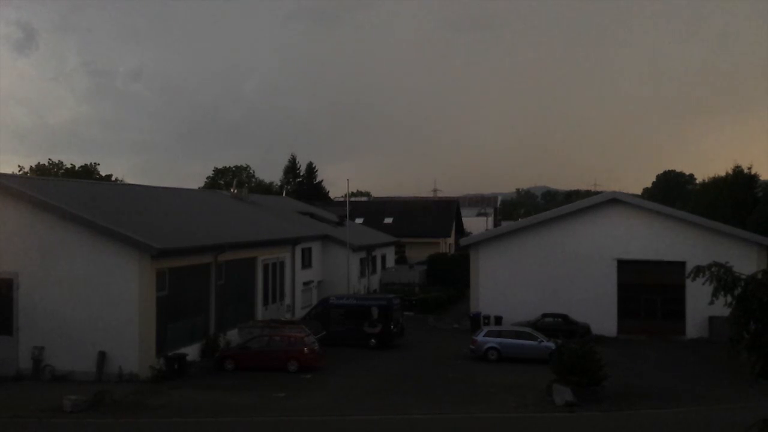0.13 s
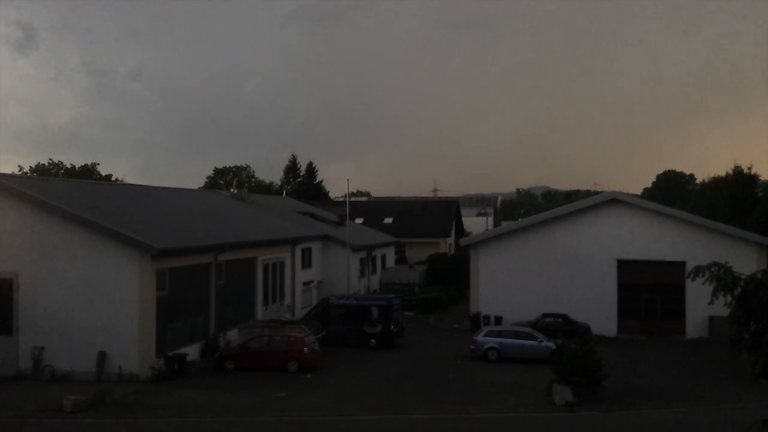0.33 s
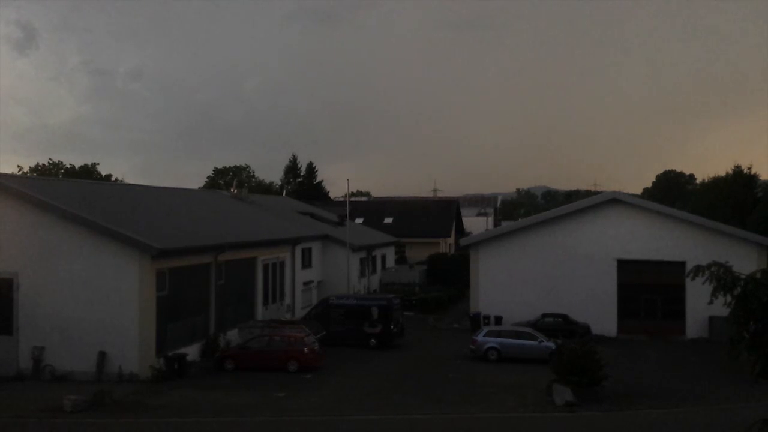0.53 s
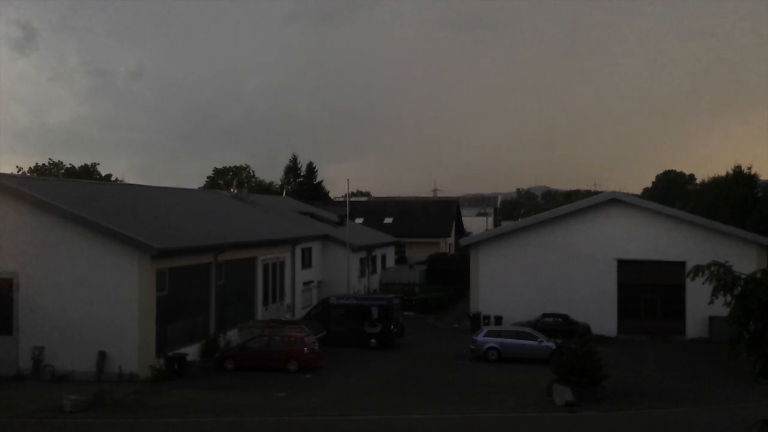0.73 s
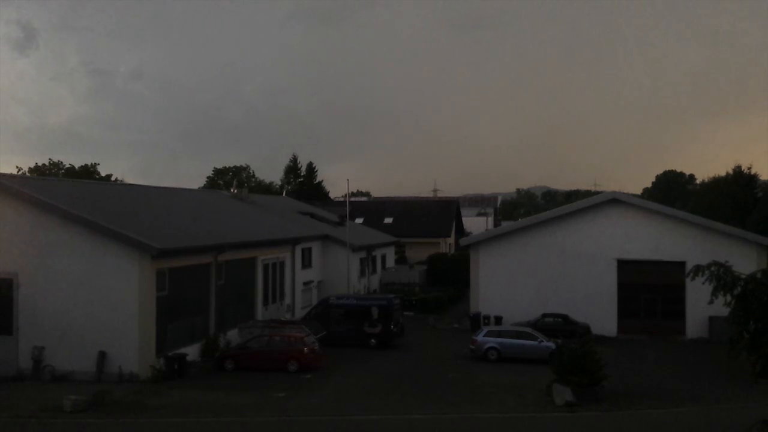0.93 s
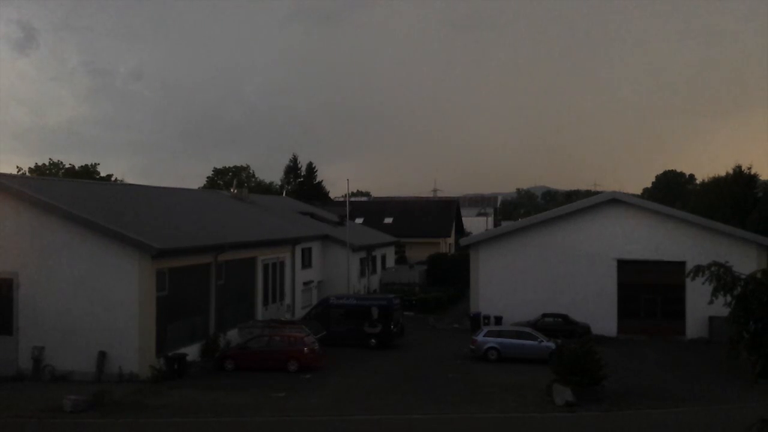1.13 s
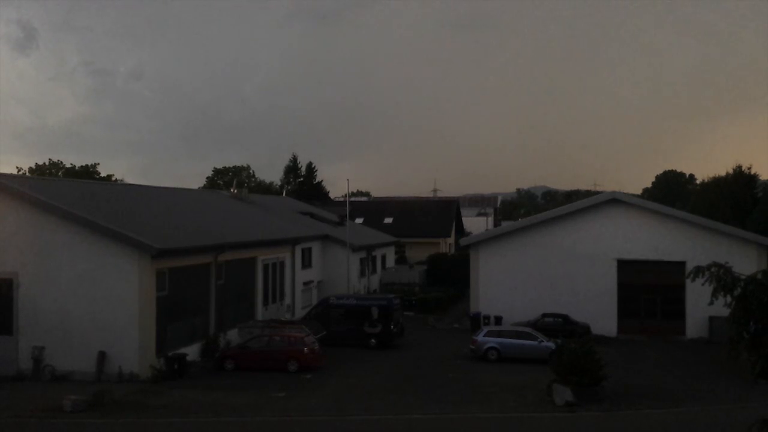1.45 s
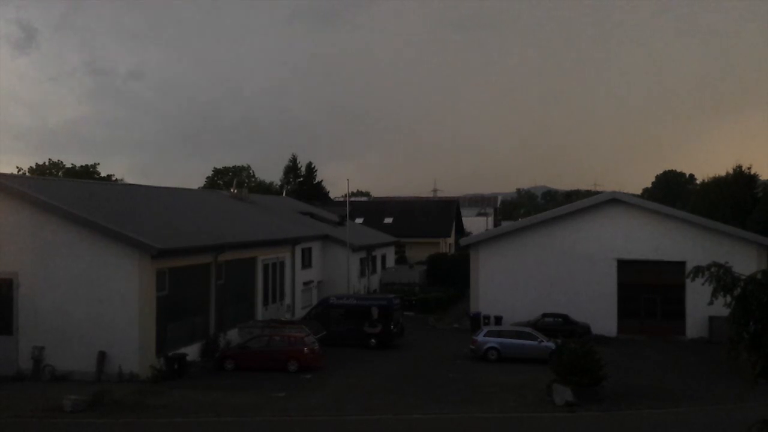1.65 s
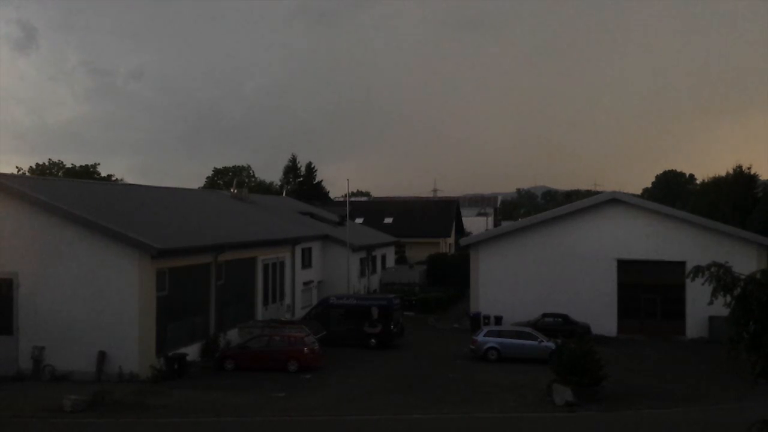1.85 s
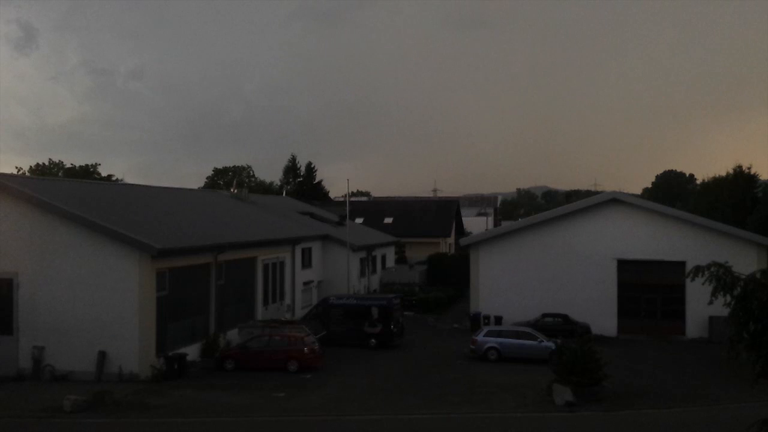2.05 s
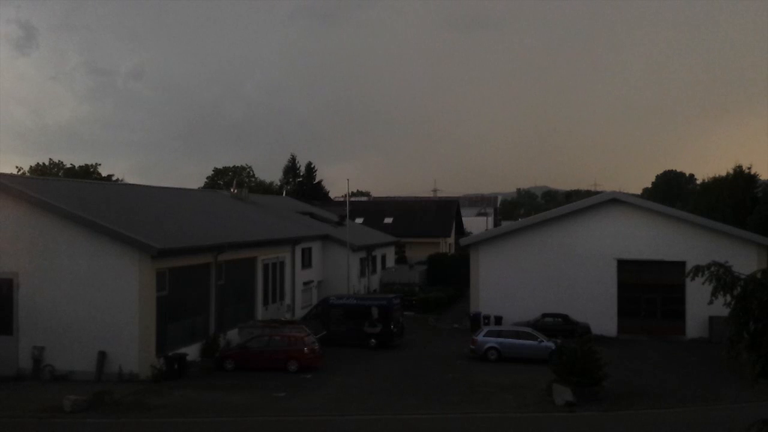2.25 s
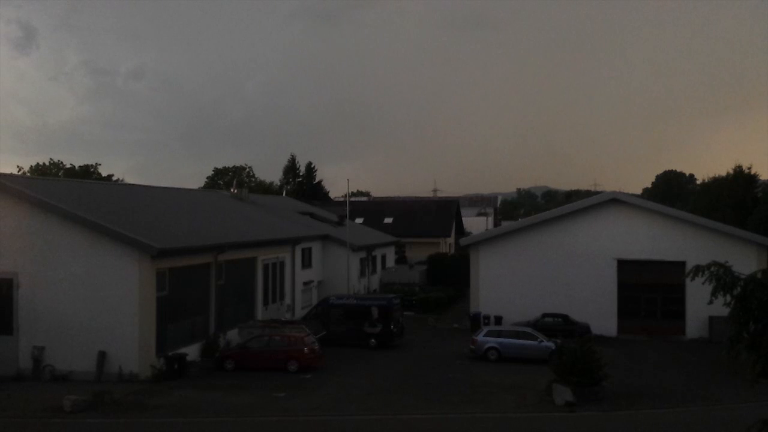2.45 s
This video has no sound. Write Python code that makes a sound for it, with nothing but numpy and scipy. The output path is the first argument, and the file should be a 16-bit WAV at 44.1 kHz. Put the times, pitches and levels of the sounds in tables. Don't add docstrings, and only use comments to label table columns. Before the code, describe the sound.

Muffled low thunder swells quickly and rumbles in overlapping claps before dying away. Faint leaf rustle, steady hiss and two tiny ticks close by; a stereo microphone in a room facing a residential yard.

```python
import sys
import numpy as np
from scipy import signal
from scipy.fft import rfft, irfft
from scipy.io import wavfile
from scipy.ndimage import uniform_filter1d

SR = 44100
rng = np.random.default_rng(int(sys.argv[2]) if len(sys.argv) > 2 else 0)


def transcribe(u):
    v = np.clip(np.atleast_2d(u).T, -1, 1)
    q = np.round(v * 32767).astype(np.int16)
    wavfile.write(sys.argv[1], SR, q)


def attenuation_scalar(level_db):
    decades = np.asarray(level_db, float) / 20
    return 10 ** decades


N = 114660


def evened(x):
    return x / np.sqrt(np.mean(x ** 2) + 1e-20)


def read(points, hz):
    f, value = np.transpose(points)
    return np.interp(np.log(hz + 1), np.log(f + 1), value)


def curve(rows, t, axis=1):
    return np.interp(t, np.array(rows)[:, 0], np.array(rows)[:, axis])


def coloured(x, points, beyond_db=-18):
    hz = np.fft.rfftfreq(N, 1 / SR)
    octaves_beyond = np.log2(np.maximum(hz / points[-1][0], 1))
    return irfft(rfft(x) * attenuation_scalar(read(points, hz) + beyond_db * octaves_beyond), N)


def resonate(x, hz, width):
    r = np.exp(-np.pi * width / SR)
    return 2 * signal.lfilter([1 - r], [1, -r * np.exp(2j * np.pi * hz / SR)], x).real


def pair(left, right, level, patchy_db, beyond_db):
    flicker_db = 0.35
    hz, t, z = signal.stft(rng.standard_normal((2, N)), SR, nperseg=512)
    patches = uniform_filter1d(rng.standard_normal(z.shape), size=8, axis=1)
    patches = evened(uniform_filter1d(patches, size=10, axis=2))
    flicker = evened(uniform_filter1d(rng.standard_normal(len(t)), size=5))
    z = z * attenuation_scalar(patchy_db * patches + flicker_db * flicker)
    x = signal.istft(z, SR, nperseg=512)[1][:, :N]
    x = evened(np.array([coloured(x[0], left, beyond_db), coloured(x[1], right, beyond_db)]))
    return x * attenuation_scalar(curve(level, np.arange(N) / SR) + 6.0)


def hiss():
    # start_s, level_db
    hiss_level = [(0, -70.5), (.17, -70), (.3, -66.5), (.7, -64.5), (1.2, -63), (2.18, -64.5), (2.4, -67.5),
                  (2.6, -66)]
    # pitch_hz, density_db (per Hz)
    left_capsule = [(1500, -4), (3000, -4.5), (5000, -2), (6200, -1.5), (7200, -4), (8500, -5.5),
                    (11000, -5), (14500, -6)]
    right_capsule = [(1500, -4), (3000, -3), (5000, -3.5), (6200, 1), (7200, 2.5), (8500, -3.5),
                     (11000, -5), (14500, -5.5)]
    return pair(left_capsule, right_capsule, hiss_level, patchy_db=0.2, beyond_db=12.5)


def whine():
    return attenuation_scalar(-87) * np.sin(2 * np.pi * 7435 * np.arange(N) / SR)


def drone():
    # pitch_hz, width_hz, level_db
    hums = [(30, 11, -59.5), (56.5, 6, -58.5)]
    out = np.zeros(N)
    for hz, width, db in hums:
        noise = rng.standard_normal(N)
        out += attenuation_scalar(db) * evened(resonate(resonate(noise, hz, width), hz, width))
    return out


def leaves():
    # start_s, level_db
    rustle_level = [(0.0, -78), (0.06, -76), (0.29, -70), (1.0, -66), (1.9, -67.5), (2.6, -70.5)]
    # pitch_hz, density_db (per Hz)
    rustle_left = [(500, -3.5), (800, -5), (1250, -5), (1420, -0.5), (1600, 0), (1850, -2.5), (2100, -12),
                   (3000, -18.5)]
    rustle_right = [(500, 2.5), (800, -9.5), (1200, -8.5), (1450, -16), (1800, -3), (2100, -10.5),
                    (3000, -22.5)]
    return pair(rustle_left, rustle_right, rustle_level, patchy_db=1.4, beyond_db=-10)


def gust():
    # start_s, level_db
    gust_level = [(0, -85.5), (1.7, -81.5), (1.85, -68), (2.05, -71.5), (2.2, -68), (2.4, -71.5),
                  (2.6, -70.5)]
    # pitch_hz, density_db (per Hz)
    gust_colour = [(300, -24), (600, -0.5), (750, -3), (950, 0.5), (1200, -4.5), (1700, -4.5), (2200, -15)]
    return pair(gust_colour, gust_colour, gust_level, patchy_db=1.0, beyond_db=-5)


def ticks():
    # start_s, peak_db, left_minus_right_db, tilt_db (per octave)
    snaps = [
        (1.1992, -54, 3, 8),
        (1.2886, -47, 4, -1),
    ]
    # pitch_hz, level_db, t60_s
    modes = [(2860, -9, 0.0042), (3900, -9, .004), (4850, 0, 0.0085), (5350, 4, 0.0067), (6100, 2.5, .01),
             (6800, -1, 0.013)]
    out, t = np.zeros((2, N)), np.arange(1300) / SR
    attack = np.minimum(t / 0.0003, 1)
    for start, peak_db, pan_db, tilt_db in snaps:
        snap = np.zeros(len(t))
        for hz, mode_db, t60 in modes:
            level_db = peak_db + mode_db + tilt_db * np.log2(hz / 6150)
            snap += attenuation_scalar(level_db - 60 * t / t60) * np.sin(2 * np.pi * hz * t)
        out[:, round(start * SR):][:, :len(t)] += attenuation_scalar([[pan_db / 2], [-pan_db / 2]]) * snap * attack
    return out


def room(x):
    # pitch_hz, width_hz, level_db
    standing_waves = [(30, 16, 2.5), (54.6, 18.7, 2.5), (84.8, 21.2, 5), (110.8, 4.9, -4), (151.64, 7, 3.5),
                      (168.1, 6.5, 4.5), (211.6, 9.6, 3.5), (234.5, 10, 2.5), (265.1, 8, 2.5),
                      (291.7, 11.4, 5), (334, 6.6, 4.5), (371.3, 15.4, -2.5), (437, 9.2, 2),
                      (513.6, 44, -3.5)]
    direct = signal.lfilter(*signal.butter(2, 92.6, "high", fs=SR), x)
    return attenuation_scalar(-1) * direct + sum(attenuation_scalar(db) * resonate(x, hz, width) for hz, width, db in standing_waves)


def roll():
    # start_s, strength_db, tilt_db (per octave around tilt_hz)
    strength = [(0, -53, -1), (.18, -54, -0.5), (.26, -39, -2.5), (.36, -38.5, -0.5), (.55, -34, -1),
                (.72, -36.5, -0.5), (.83, -39, 0), (1, -37, 0), (1.18, -35, 0.5), (1.4, -35, 1),
                (1.6, -36.5, -1.5), (1.85, -40, 1.5), (1.93, -40.5, 3), (2.02, -37, 0.5), (2.1, -42, -0.5),
                (2.19, -41, -0.5), (2.4, -47, 0), (2.6, -46.5, 2)]
    # pitch_hz, density_db (per Hz)
    air = [(12, -42), (20, -30.5), (80, -3.5), (114, -2.5), (156, -1), (264, -8.5), (440, -17.5),
           (743, -33), (900, -41), (1170, -56), (1980, -120)]
    shocks_per_s, size_spread_db, tilt_hz = 2500, 1.35, 164
    size = attenuation_scalar(size_spread_db * np.minimum(rng.exponential(1, N), 4))
    size = size * (rng.random(N) < shocks_per_s / SR)
    shocks = coloured(size * rng.choice([-1., 1.], N), air)
    shocks /= np.std(room(shocks))
    hz, t, z = signal.stft(shocks, SR, nperseg=2048, noverlap=1536)
    octaves = np.log2(np.clip(hz, 25, 700) / tilt_hz)[:, None]
    z = z * attenuation_scalar(octaves * np.clip(curve(strength, t, axis=2), -2, 2))
    tilted = signal.istft(z, SR, nperseg=2048, noverlap=1536)[1][:N]
    return tilted * attenuation_scalar(curve(strength, np.arange(N) / SR))


def claps():
    # start_s, peak_db, pitch_hz, length_s
    swells = [(.21, -32, 153.7, 0.13), (0.276, -34, 286, 0.058), (0.329, -34.5, 86, .08),
              (.336, -38.5, 156, 0.13), (0.493, -34, 86.2, 0.15), (0.52, -37.5, 260.4, 0.26),
              (.519, -38, 146.6, 0.047), (.542, -29.5, 212, 0.02), (.606, -30, 153.4, 0.16),
              (.74, -45, 437, 0.076), (.87, -31, 150.3, 0.17), (0.912, -34, 260, 0.16),
              (1.167, -20.5, 217, 0.024), (1.076, -31.5, 257.4, 0.084), (1.058, -44.5, 52.4, 0.38),
              (1.099, -29.5, 166.2, 0.053), (1.136, -31, 157.9, 0.088), (1.14, -30.5, 222.2, 0.076),
              (1.201, -40.5, 30, 0.3), (1.28, -38.5, 221.4, 0.067), (1.358, -29, 257, 0.027),
              (1.382, -37.5, 215.7, 0.18), (1.4, -42.5, 334, 0.25), (1.533, -36, 173, .2),
              (1.622, -40, 85.3, 0.15), (1.713, -36, 173, 0.19), (1.787, -37.5, 220, 0.124),
              (1.799, -47, 437, .14), (1.93, -35, 210.4, .16), (2.45, -46.5, 173.6, 0.15)]
    out = np.zeros(N + SR)
    for start, peak_db, hz, length in swells:
        t = np.arange(0, max(length, 0.008), 1 / SR)
        swell = np.hanning(len(t)) * np.sin(2 * np.pi * hz * t)
        out[round(start * SR):][:len(t)] += attenuation_scalar(peak_db - 1.5) * swell
    return out[:N]


def thunder():
    # pitch_hz, side_minus_mid_db
    spread = [(25, -28), (60, -18.5), (125, -20), (250, -11), (500, -10.5), (900, -13)]
    lag_s, lean_db = 0.00011, -0.9
    mid = attenuation_scalar(-1) * room(roll()) + claps() + drone()
    side = coloured(room(roll()), spread, beyond_db=0)
    late = np.interp(np.arange(N) - lag_s * SR, np.arange(N), mid)
    return np.array([late + side, mid - side]) * attenuation_scalar([[lean_db / 2], [-lean_db / 2]])


def scene():
    return leaves() + gust() + ticks() + thunder()


def band_limit(x):
    return signal.sosfilt(signal.butter(12, 14690, fs=SR, output="sos"), x)


def record(dry):
    offset = -0.0005
    return band_limit(dry + hiss() + whine() + offset)


dry = scene()
out = record(dry)
transcribe(out)
```